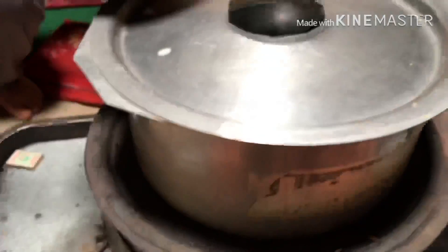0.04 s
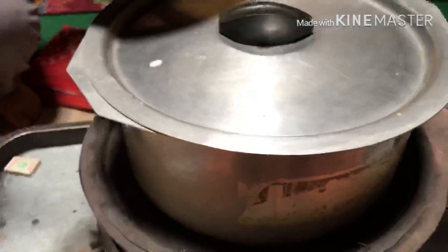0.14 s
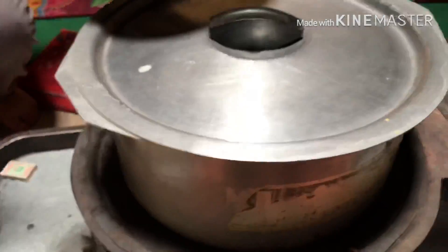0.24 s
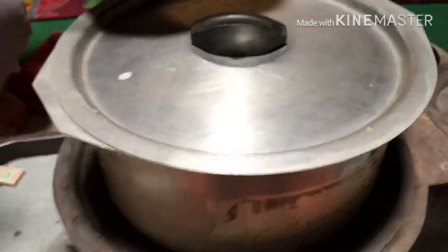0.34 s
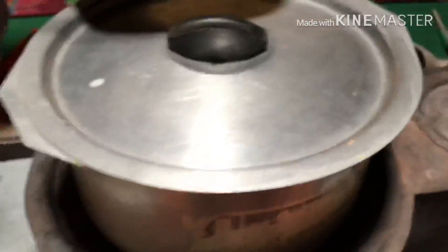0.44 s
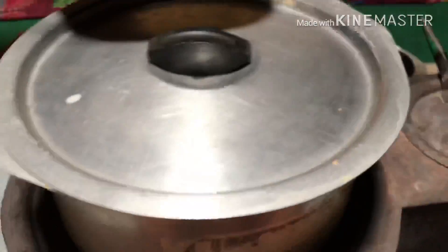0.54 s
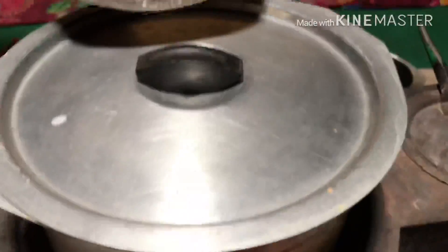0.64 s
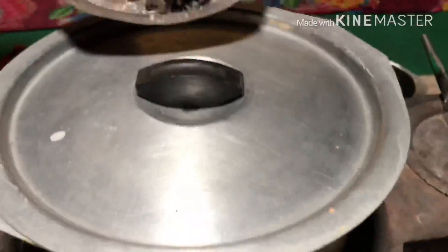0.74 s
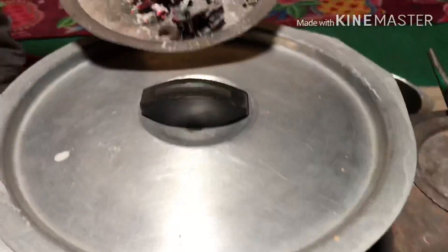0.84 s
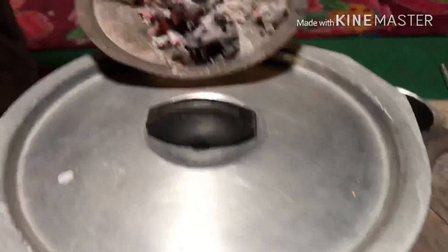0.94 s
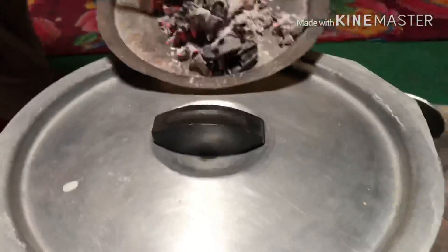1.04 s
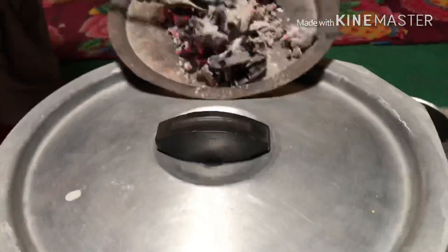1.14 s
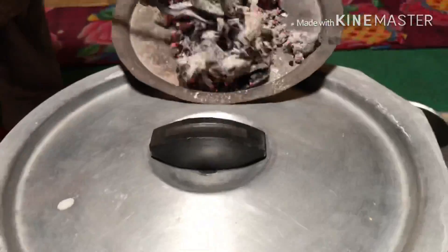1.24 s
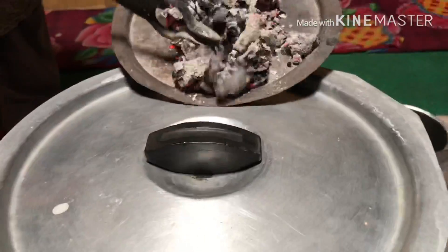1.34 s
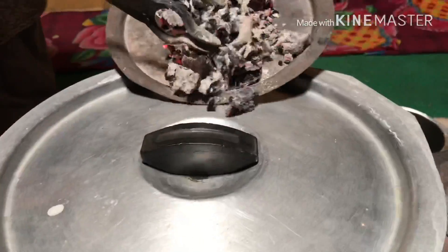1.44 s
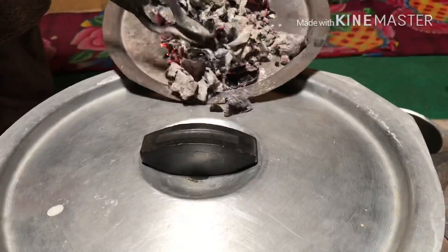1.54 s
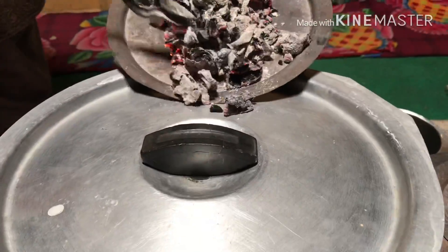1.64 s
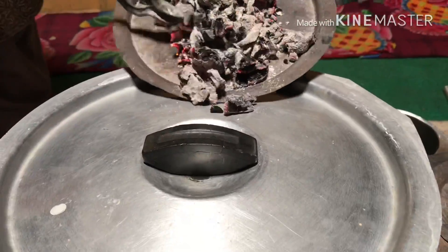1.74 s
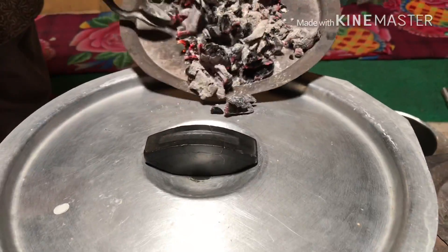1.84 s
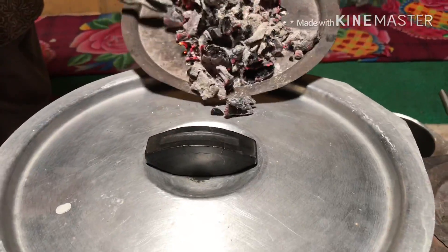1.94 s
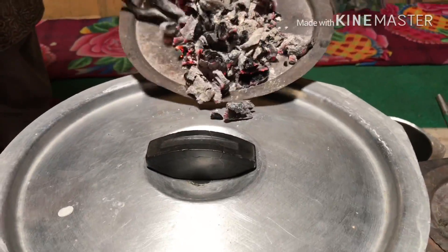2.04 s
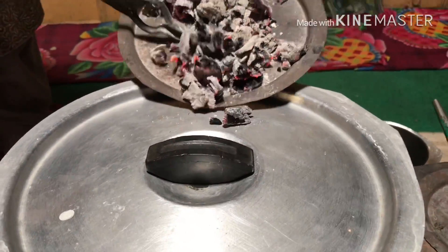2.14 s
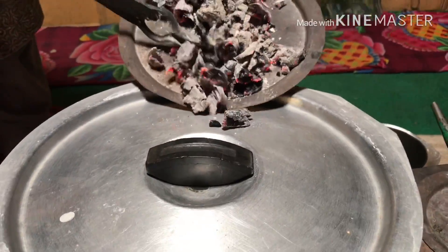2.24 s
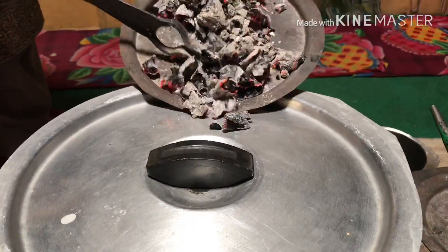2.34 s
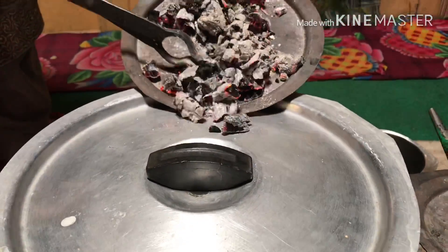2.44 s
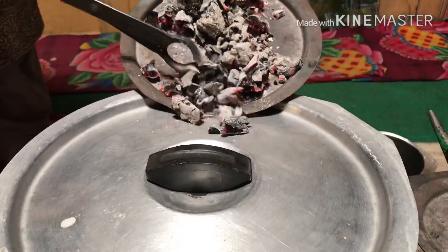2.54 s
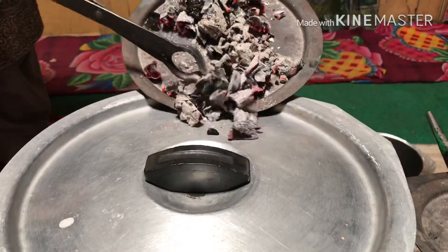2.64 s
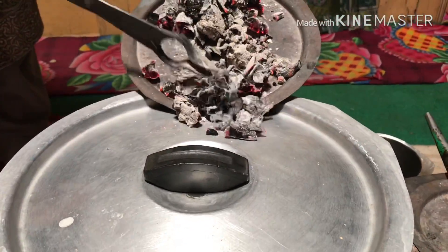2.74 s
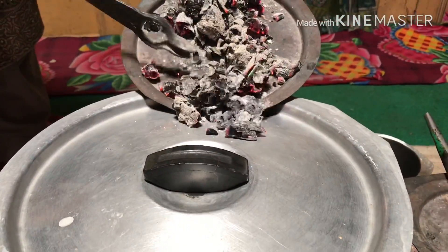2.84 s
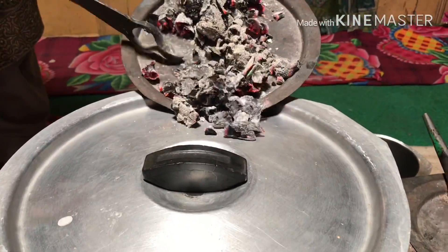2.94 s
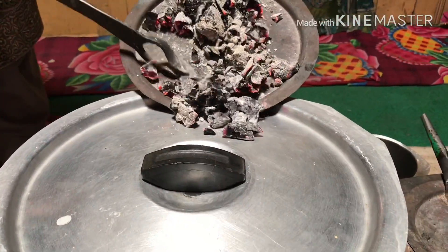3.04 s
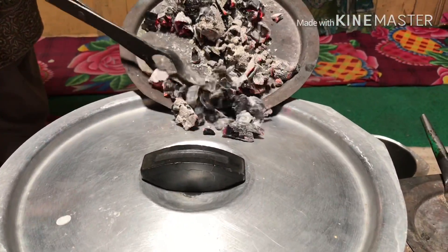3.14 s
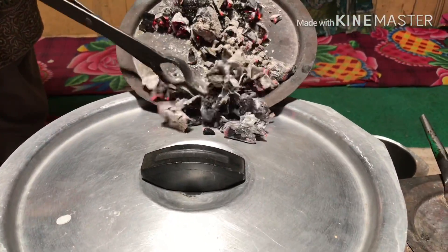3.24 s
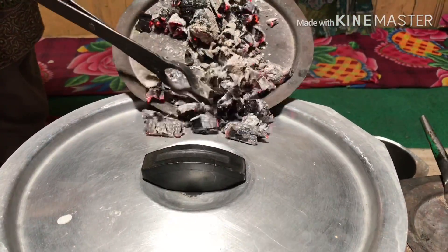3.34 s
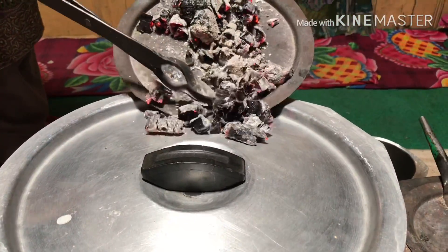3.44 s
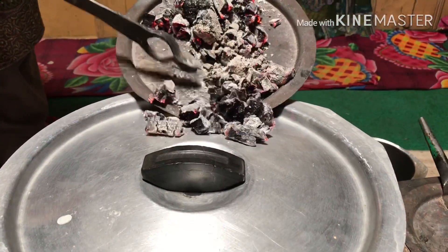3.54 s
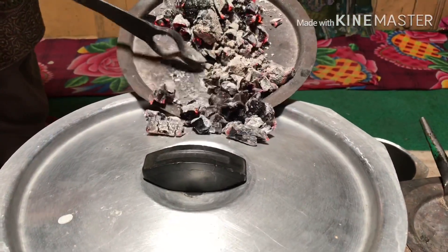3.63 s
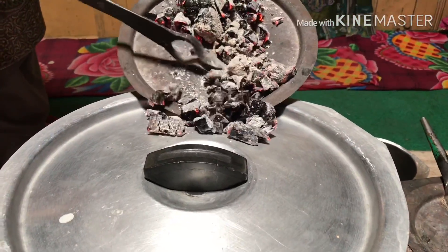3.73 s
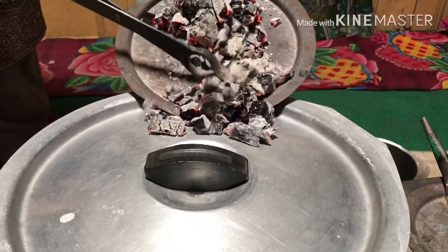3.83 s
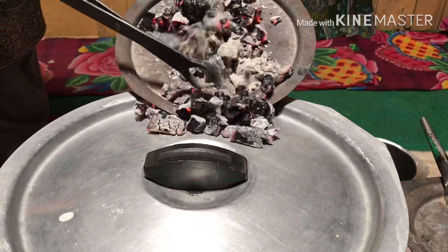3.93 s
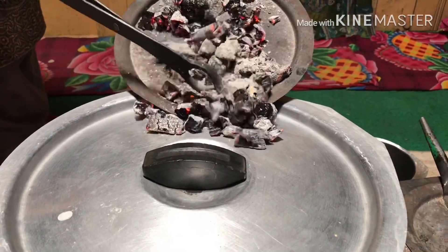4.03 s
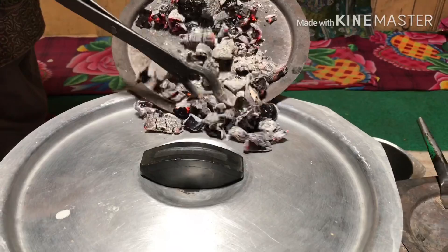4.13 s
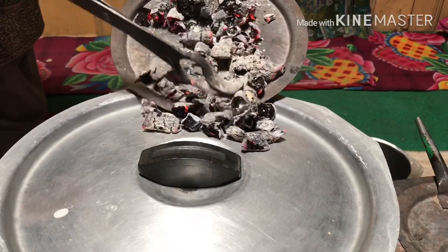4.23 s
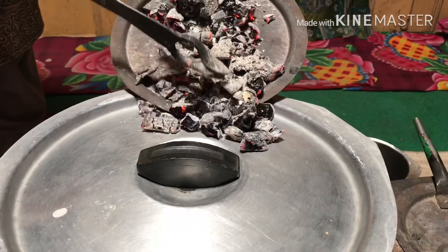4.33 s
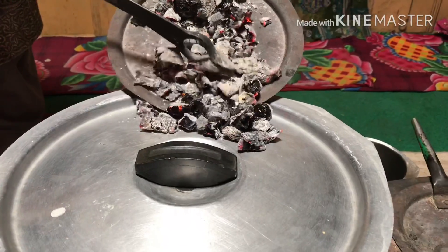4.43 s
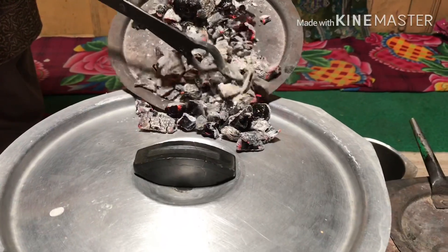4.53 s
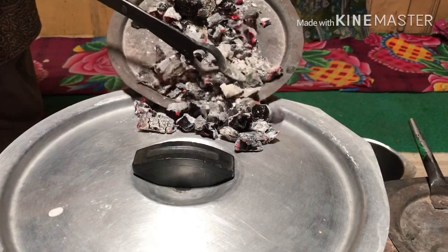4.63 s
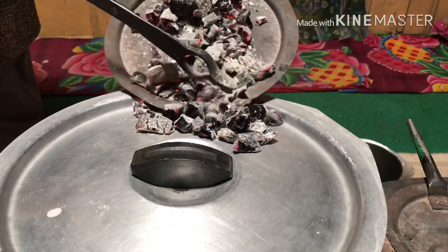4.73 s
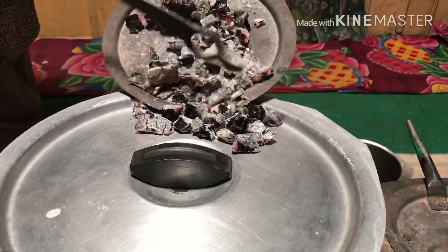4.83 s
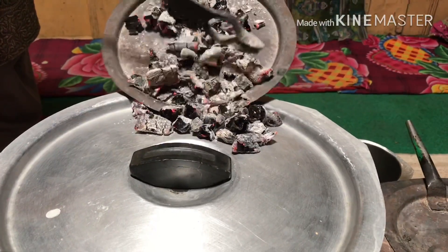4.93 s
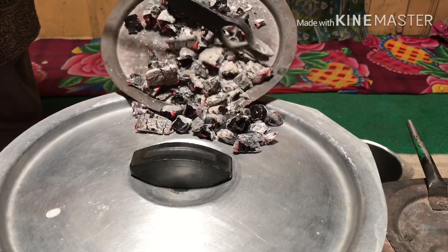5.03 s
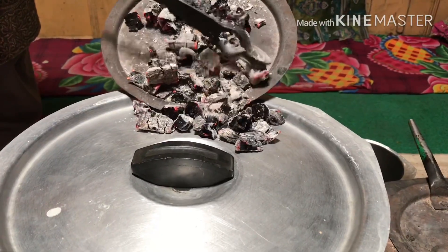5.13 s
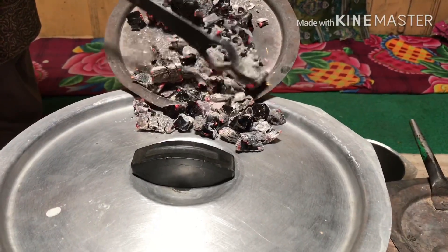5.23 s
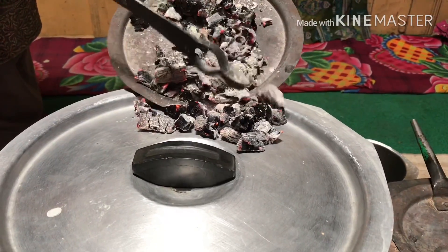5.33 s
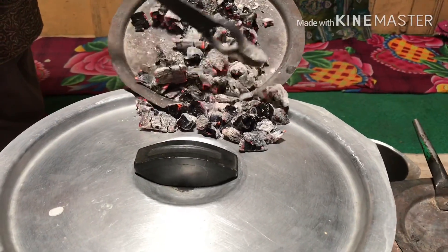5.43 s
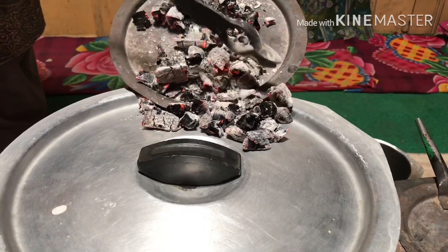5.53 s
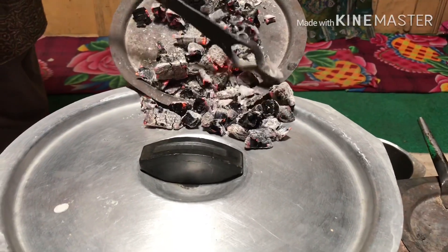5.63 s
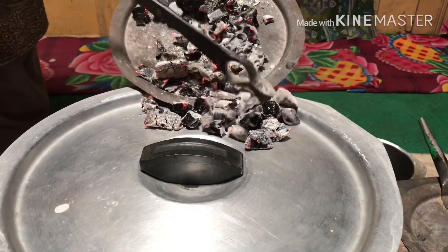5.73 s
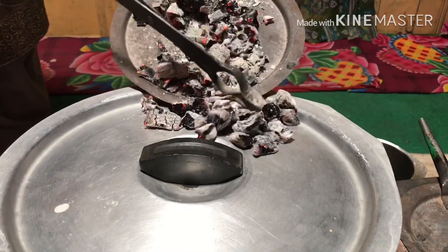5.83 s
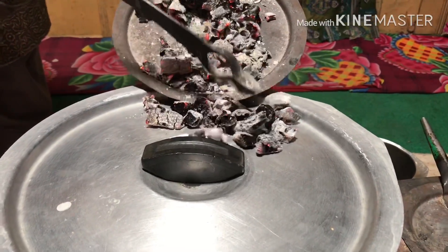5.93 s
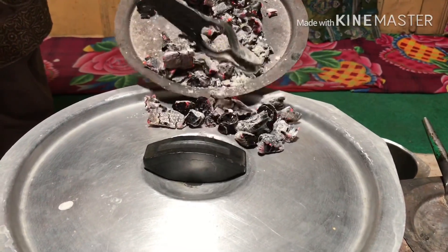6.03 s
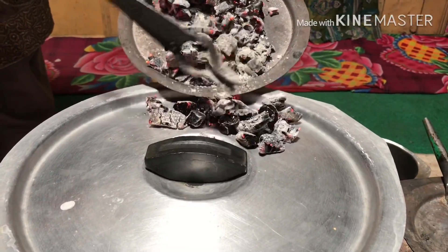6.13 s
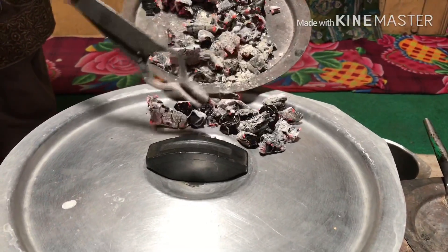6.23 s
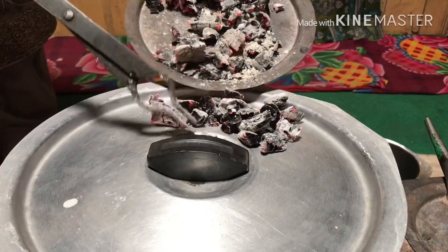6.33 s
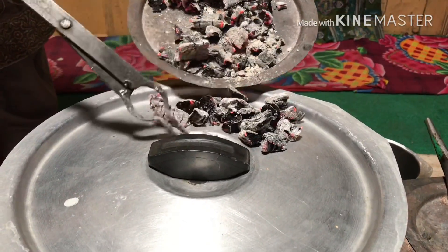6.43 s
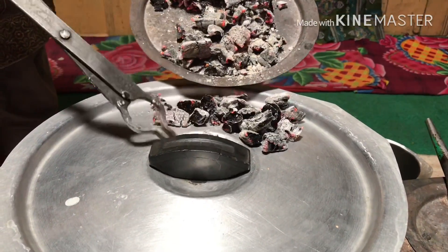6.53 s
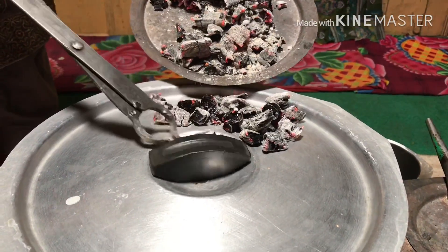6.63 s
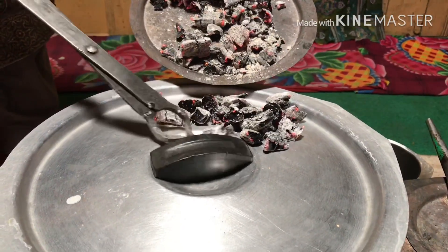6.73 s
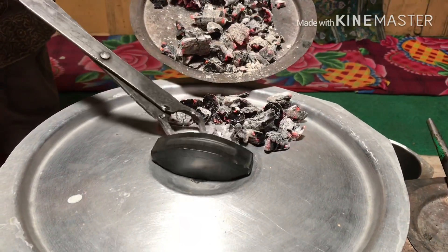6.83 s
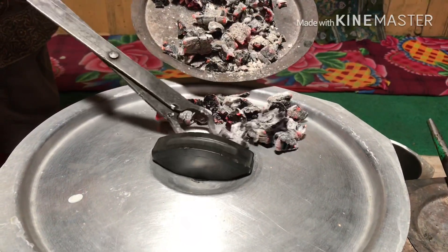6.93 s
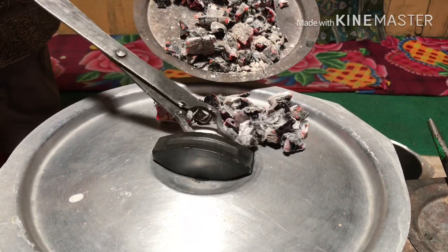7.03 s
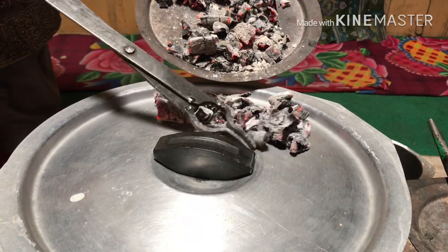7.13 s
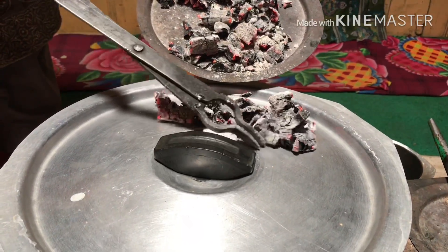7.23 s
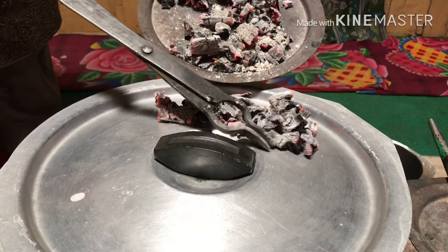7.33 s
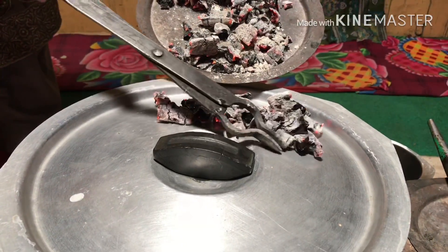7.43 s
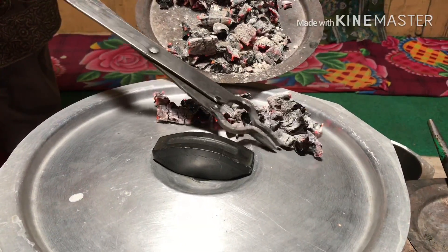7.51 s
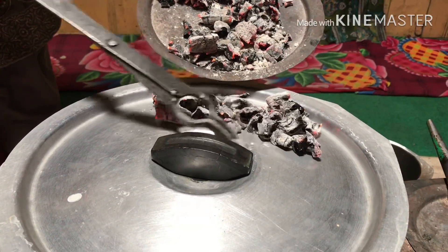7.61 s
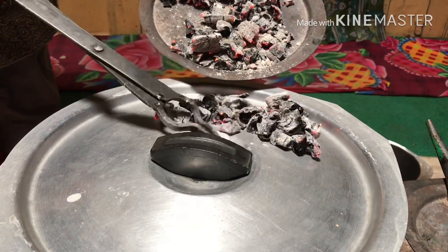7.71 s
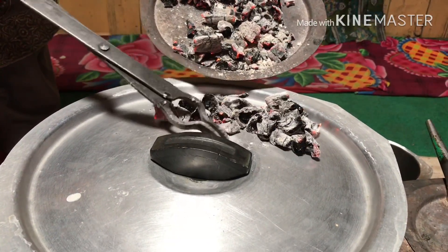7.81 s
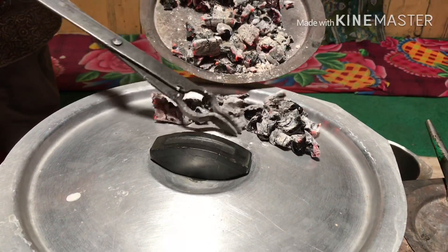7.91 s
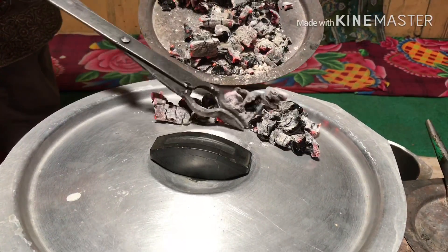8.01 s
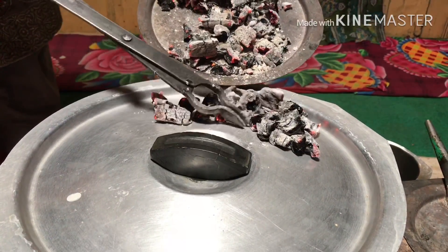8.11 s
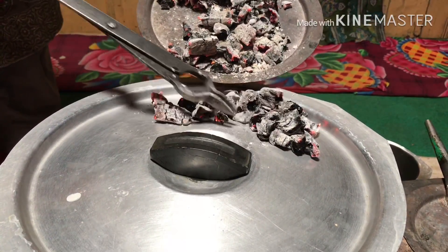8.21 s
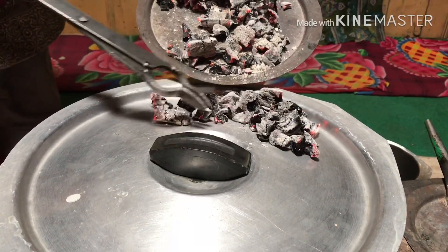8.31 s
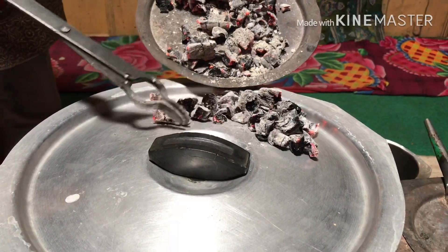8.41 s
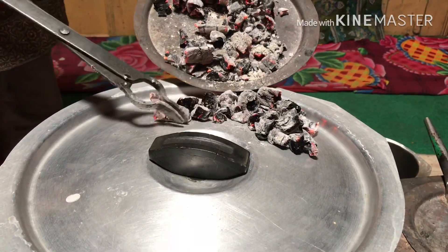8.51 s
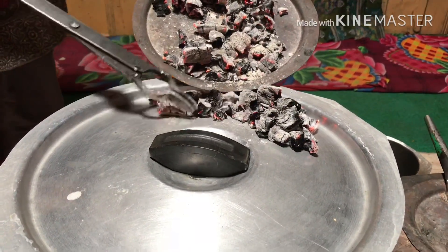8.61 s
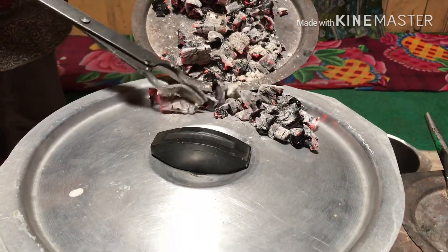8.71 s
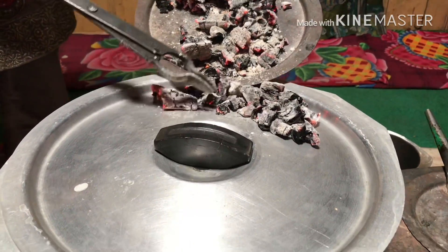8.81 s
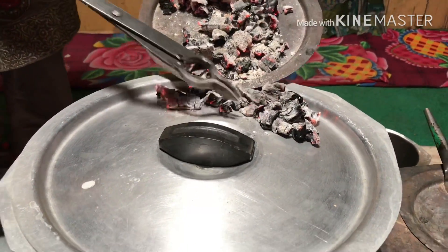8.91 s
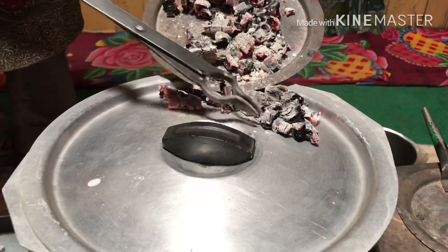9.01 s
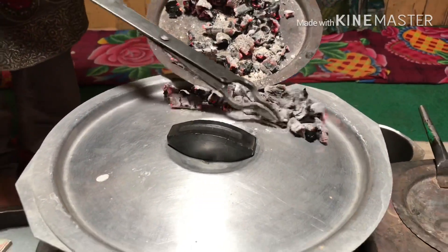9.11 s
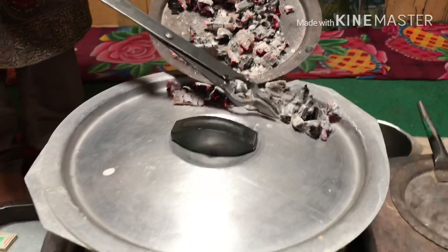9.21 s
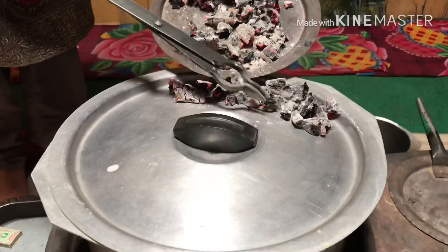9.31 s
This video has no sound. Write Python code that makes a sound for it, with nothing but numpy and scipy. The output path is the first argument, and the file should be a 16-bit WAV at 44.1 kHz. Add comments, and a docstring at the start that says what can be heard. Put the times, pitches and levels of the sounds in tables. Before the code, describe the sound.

A close, fairly dry sound in a small room with a quiet low hush. From 0 to 1 s there are soft dull taps, rustling and fumbling hands, with a tiny bright crackle at 0.7. From about 1.2 to 1.7 s a metal pan rim bumps and chatters boomily on an aluminium pot lid, with tong clinks. At 2.1 s tongs strike the pan with a clear short ring; raking follows, with crunching charcoal, a lump clacking down at 2.5 and a clink at 2.8. The loudest clank comes at 2.95, then busy scraping, low dragging and a bump at 3.65. Between 4.4 and 5.8 s lumps clack onto the lid while raking thins. After a lull, tong tips knock at 6.5 and scrape, with short narrow squeals and gritty zing around 7.2 to 8 s. Softer knocks, scrapes, small clinks and crunching coals finish by 9.3 s.

```python
"""In a small room with a soft hush, hands first tap, rustle and fumble, and a piece of charcoal crackles.
Tongs then rake glowing charcoal in a metal pan: it crunches and the steel arms shimmer and clink.
The pan's rim bumps an aluminium lid, the tongs strike the pan, the pan drags, lumps fall out.
Last, the tong tips scrape, squeal and knock on the lid as they spread the coals.
Blows are fading tones plus shaped noise; rubbing is a stream of tiny random contacts."""
import sys
import numpy as np
from scipy import signal
from scipy.fft import rfft, irfft, next_fast_len
from scipy.io import wavfile

SR = 44100
rng = np.random.default_rng(int(sys.argv[2]) if len(sys.argv) > 2 else 0)


def wav_out(sig):
    """Save sig, one row per channel (or a flat mono array), as 16-bit PCM at SR to the path in sys.argv[1]."""
    wavfile.write(sys.argv[1], SR, np.round(np.clip(np.atleast_2d(sig).T, -1, 1) * 32767).astype(np.int16))


N = 412776
RING_TIME = np.arange(int(.6 * SR)) / SR   # seconds since a strike
MEDIUM_DB = -52   # stroke level at which a side effect has its own medium level
STROKE_ATTACK_S = 0.0081   # every stroke takes hold within this time
# Levels in the tables are before each sound's own trim and the room.


def from_db(db):
    """Turn decibels into a gain."""
    return 10 ** (np.asarray(db) / 20)


def rms_one(x):
    """Scale a signal to an rms of 1."""
    return x / np.sqrt(np.mean(x ** 2) + 1e-20)


def band(x, low_hz, high_hz):
    """Keep only the sound between two pitches."""
    sos = signal.butter(2, [low_hz, min(high_hz, .45 * SR)], "band", fs=SR, output="sos")
    return signal.sosfilt(sos, x)


def coloured(x, colour):
    """Shape the balance of low and high sound with a colour table; rms 1."""
    size = next_fast_len(len(x))
    hz, db = np.transpose(colour)
    bins = np.maximum(np.arange(size // 2 + 1) * SR / size, 1)
    gain = from_db(np.interp(np.log(bins), np.log(hz), db))
    gain = gain * np.minimum(bins / hz[0], 1) ** 2   # fall away below the first pitch
    return rms_one(irfft(rfft(x, size) * gain, size)[:len(x)])


def drift(per_s):
    """Wander randomly through new values, per_s of them each second."""
    return np.interp(np.arange(N) / SR * per_s, np.arange(4096), rng.standard_normal(4096))


def dying(t60):
    """Fade by 60 dB in t60 seconds, like a ringing object."""
    return from_db(-60 * RING_TIME / t60)


def body(modes, colour, modes_db, ring_t60, bass_t60, crack_db, crack_t60):
    """Make a struck object: separate tones, a dense noisy ring and a brief crack."""
    hz, db, t60 = np.reshape(modes, (-1, 3)).T
    partials = np.exp(2j * np.pi * hz[:, None] * RING_TIME) * dying(t60[:, None])

    def strike(free_db=0):
        """Each point of contact excites the tones differently; a body left free rings more clearly."""
        weights = from_db(db + modes_db + free_db + 2 * rng.standard_normal(len(db)))
        weights = weights * np.exp(2j * np.pi * rng.random(len(db)))   # random phases
        tones = (weights @ partials).imag
        dense = coloured(rng.standard_normal(len(RING_TIME)), colour)
        low_pass = signal.butter(2, 350, fs=SR, output="sos")
        bass = signal.sosfiltfilt(low_pass, dense, padtype=None)
        upper_fade = dying(ring_t60) + from_db(crack_db) * dying(crack_t60)
        return tones + bass * dying(bass_t60) + (dense - bass) * upper_fade
    return strike


# Limits of the bass, middle, treble and top bands: pitch_hz
BAND_EDGES_HZ = [40, 400, 2000, 6000, 16000]


def blows(rows, strike, gain_db, bounce_db, top_db, top_follows):
    """A first contact and small bounces; thump sets the bass, hardness the treble and the top."""
    out = np.zeros(N + 2 * len(RING_TIME))
    attack = int(.02 * SR)   # the level is set over these first samples
    for s, level_db, thump_db, hard_db, chatter_ms, *free_db in rows:
        contact = np.zeros(int(abs(chatter_ms) * SR / 1000) + 2)
        bounces = (rng.random(size=6) * len(contact)).astype(int)
        contact[bounces] = from_db(bounce_db) * rng.standard_normal(size=6)
        contact[0] = 1
        sound = signal.fftconvolve(strike(*free_db), contact)[:len(RING_TIME)]
        start = int(s * SR)
        band_levels = (thump_db, 0, hard_db, top_db + top_follows * hard_db)
        for k, db in enumerate(band_levels):
            part = band(sound, *BAND_EDGES_HZ[k:k + 2]) * (-1) ** k   # alternate signs join without a notch
            gain = from_db(level_db + db + gain_db) / np.std(part[:attack])
            out[start:start + len(part)] += part * gain
    return out[:N]


def slips(per_s, spread_db, surge_db):
    """Friction as tiny random contacts of uneven size that come in surges; rms 1."""
    sizes = from_db(spread_db * np.minimum(rng.exponential(1, N), 4)) * rng.choice([-1, 1], N)
    happens = rng.random(N) < per_s / SR
    return rms_one(sizes * happens * from_db(surge_db * drift(70)))


def rubbed(friction, strike, free_db=0, count=3):
    """Friction makes a body ring; the contact hops between spots, each with its own colour."""
    spot = np.argmax([drift(45) for _ in range(count)], axis=0)
    out = np.zeros(N)
    for k in range(count):
        response = strike(free_db)
        response = response / np.linalg.norm(response)
        out += signal.oaconvolve(friction * (spot == k), response)[:N]
    return out


def strokes(rows, swell_db, release_t60):
    """Turn (start_s, length_s, level_db) rows into a loudness curve: attack, changing hold, release."""
    t, out = np.arange(N) / SR, np.zeros(N)
    for start, length, db in rows:
        near = (t > start) & (t < start + length + release_t60)
        age = t[near] - start
        swell = swell_db * (np.minimum(age / length, 1) - .5)
        release = -60 * np.maximum(age - length, 0) / release_t60
        out[near] += np.minimum(age / STROKE_ATTACK_S, 1) * from_db(db + swell + release)
    return out


def driven(rows, medium_db, follows):
    """Make a side effect of the strokes; its level moves by `follows` dB per dB of theirs."""
    return [(s, length, medium_db + follows * (db - MEDIUM_DB)) for s, length, db in rows]


# Loudness of the hush over time: time_s, level_db
HUSH = [(0, -63), (.8, -65), (1.9, -66.5), (5.5, -63), (6.4, -68.5), (8.35, -70), (9.36, -66.5)]
# Balance of low and high sound in the hush: pitch_hz, level_db
ROOM_COLOUR = [(15, -66), (25, -34), (92, 4), (137, -5.5), (161, 1.5), (223, -5), (754, -11.5), (911, -9.5),
               (1020, -12), (2350, -12.5), (2550, -12.5), (3720, -17), (16000, -23)]


def background_hush():
    """Steady shaped noise whose level slowly rises and falls."""
    level = from_db(np.interp(np.arange(N) / SR, *np.transpose(HUSH)))
    return level * coloured(rng.standard_normal(N), ROOM_COLOUR)


# Dry handling taps, and one bright charcoal crackle at 0.659 s:
# start_s, level_db, thump_db, hardness_db, chatter_ms
TAPS_AND_CRACKLE = [(0.036, -48, -7, -8.5, 1.1), (0.421, -50, -4, -10.5, 1.93),
                    (0.461, -53.5, 4.5, -26, 0.95), (0.659, -63, -17, 15, 1.04), (0.724, -69, 16, -1, 16),
                    (0.925, -54.5, -3, -15, 2.9), (0.949, -55.5, 9, -15, 2.8)]
# Balance of low and high sound in taps and fumbling: pitch_hz, level_db
TAP_COLOUR = [(29, -37), (50, 15.5), (507, 0.5), (678, -8.5), (927, -3.5), (1780, -20), (3250, -19),
              (10400, -44), (14500, -32), (16000, -41)]


def taps_and_crackle():
    """Dry taps, mostly dull, and one bright crackle: fast-fading noise with no separate ringing tones."""
    tap = body([], TAP_COLOUR, modes_db=0, ring_t60=0.049, bass_t60=0.022, crack_db=12.0, crack_t60=.008)
    return blows(TAPS_AND_CRACKLE, tap, gain_db=-1.5, bounce_db=-19.5, top_db=-3, top_follows=0.64)


# Light rustles of handling: start_s, length_s, level_db
RUSTLES = [(0.04, 0.068, -56.5), (0.91, 0.31, -77), (1.74, 0.05, -63)]


def rustling():
    """Many tiny contacts every second, kept to the upper middle pitches."""
    moving = strokes(RUSTLES, swell_db=-1.5, release_t60=0.043)
    return moving * rms_one(band(slips(3200, 3.0, 2.0), 1800, 5600))


# Soft fumbling of hands: start_s, length_s, level_db
FUMBLES = [(0.05, 0.15, -59.5), (0.33, 0.064, -53.5), (0.53, 0.35, -64), (0.91, 0.026, -53),
           (1.06, 0.027, -61)]


def fumbling():
    """Low, soft rubbing with sparse dry ticks while the hands move."""
    moving = strokes(FUMBLES, swell_db=-3.0, release_t60=0.11)
    soft = rms_one(band(coloured(slips(540, 5.0, 1.2), TAP_COLOUR), 45, 860))
    ticks = rms_one(band(coloured(slips(59, 3.4, 2), TAP_COLOUR), 1240, 15000))
    return moving * (soft + from_db(-11) * ticks)


# Ringing tones of the pan: pitch_hz, level_db, fade_60db_s
PAN_MODES = [(134, -30, .3), (272, -15, 0.22), (575, -8, 0.055), (890, 4, 0.083), (997, -3.5, 0.075),
             (1023, -6, 0.14), (1270, -7, 0.074), (1511, -1, 0.099), (1610, -7.5, 0.16), (1700, -9.5, .12),
             (2114, -4.5, 0.11), (2470, 0, 0.058), (3460, -13, 0.14), (5010, -2.5, 0.13),
             (5110, -11.5, 0.087), (7220, -2, 0.041)]
# Balance of low and high sound in the dense ring of pan and tong arms: pitch_hz, level_db
PAN_COLOUR = [(29, -32), (50, -20.5), (125, 7.5), (208, -1.5), (252, -1.5), (298, -3.5), (630, -18),
              (884, -2.5), (1150, -6), (1620, -4), (4450, -12), (5020, -9.5), (6390, -18.5), (8540, -16.5),
              (16000, -29.5)]


def pan_bowl():
    """The metal pan as the tongs hit or rub it."""
    return body(PAN_MODES, PAN_COLOUR, modes_db=0, ring_t60=0.18, bass_t60=0.12, crack_db=6, crack_t60=0.035)


# Strokes of the tongs through the coals in the pan: start_s, length_s, force_db
RAKE_STROKES = [(0.879, 0.46, -62.5), (1.167, 0.17, -74), (2.1, 0.25, -57), (2.348, 0.38, -53),
                (2.983, 0.056, -38.5), (3.086, 0.063, -39), (3.174, 0.13, -58), (3.295, 0.036, -46.5),
                (3.39, 0.18, -61), (3.739, 0.14, -38.5), (3.911, 0.13, -54), (4.121, 0.046, -48),
                (4.345, 0.17, -59), (4.628, 0.039, -52.5), (5.068, 0.16, -62)]


def raking():
    """The tongs rub the pan, and the uneven contacts make the metal ring."""
    moving = strokes(RAKE_STROKES, swell_db=0.5, release_t60=0.14)
    scrape = rubbed(moving * slips(500, 3.85, 1.2), pan_bowl(), free_db=-3.5, count=5)
    return from_db(-2) * band(scrape, 160, 9900)


# The heap on the lid is pushed and settles: start_s, length_s, crunch_db
HEAP_SHIFTS = [(5.78, 0.044, -50.5), (5.86, 0.28, -72.5), (7.702, 0.009, -51.5), (7.98, 0.035, -55),
               (8.06, 0.053, -61), (8.46, 0.28, -59.5), (8.71, 0.043, -60), (8.92, 0.28, -61.5)]


def coal_motion():
    """Lumps grind whenever the pan is raked or the heap on the lid shifts."""
    in_pan = driven(RAKE_STROKES, medium_db=-58.5, follows=0.72)
    return strokes(in_pan + list(HEAP_SHIFTS), swell_db=1.5, release_t60=0.24)


# Balance of low and high sound in the crunch: pitch_hz, level_db
CRUNCH_COLOUR = [(2500, -14.5), (5000, -4), (7500, -2.5), (10000, 0), (13000, -11.5), (15000, -1.5),
                 (16000, 4)]


def coal_crunch():
    """Moving lumps grind together in bright, strongly surging bits of noise."""
    return from_db(-3.5) * coal_motion() * coloured(slips(1800, 3.5, 4.5), CRUNCH_COLOUR)


# Ringing tones of the tongs' steel arms: pitch_hz, level_db, fade_60db_s
TONG_MODES = [(1092, -5.5, 0.12), (2687, 6.5, 0.1), (2967, 4.5, 0.18), (3290, 7, 0.16), (3805, 4.5, 0.19),
              (4140, -22, 0.13), (4305, 2.5, 0.18), (5150, 2.5, 0.14), (5510, -3, 0.069), (5950, 0.5, 0.13),
              (6780, -3, 0.22), (7393, 0, 0.11), (8270, -9, 0.19), (8700, -0.5, 0.06), (9000, -19, 0.15),
              (9400, -9, 0.14), (9460, -4, 0.12), (11050, -3.5, 0.16), (12600, -3, 0.068),
              (14360, -3.5, 0.081)]


def tong_arms():
    """The steel arms, held free so that their tones stand out."""
    return body(TONG_MODES, PAN_COLOUR, modes_db=5.5, ring_t60=0.21, bass_t60=0.16,
                crack_db=9.5, crack_t60=0.037)


def arm_shimmer():
    """Moving coals keep the arms ringing in their high tones."""
    shimmer = rubbed(coal_motion() * slips(700, 2.5, 8.1), tong_arms(), free_db=2)
    return from_db(2.5) * band(shimmer, 4200, 18000)


# Ringing tones of rim and lid together: pitch_hz, level_db, fade_60db_s
RIM_MODES = [(124.8, 6, 0.17), (161, -3, 0.15), (338, -2.5, 0.094), (435.5, -8, 0.13), (868, 4.5, 0.18),
             (898, -4.5, 0.13), (1049, 1, 0.066), (1630, -10, 0.16), (2290, -3, 0.084), (2790, -13.5, 0.26),
             (2930, -11, 0.23), (3304, -6.5, 0.19), (3810, -5, 0.15), (4480, -9, 0.058), (4560, -2.5, .08),
             (5110, -3.5, 0.044), (5900, -8.5, 0.14), (6380, -26, .1), (6780, -9, .1), (7270, -9, .1),
             (7940, -31, 0.11), (8800, -8.5, 0.064), (9320, -10.5, 0.042)]
# Balance of low and high sound in their dense ring: pitch_hz, level_db
RIM_COLOUR = [(29, -43), (50, -5), (135, 10.5), (198, -28), (450, -20.5), (711, -19), (842, -10),
              (1700, -14), (3330, -12.5), (3580, -15.5), (7040, -22.5), (16000, -33.5)]


def pan_rim():
    """The pan's rim against the lid, which booms."""
    return body(RIM_MODES, RIM_COLOUR, modes_db=2.5, ring_t60=0.23, bass_t60=0.071,
                crack_db=15.5, crack_t60=0.015)


# The pan's rim bumps the lid: start_s, level_db, thump_db, hardness_db, chatter_ms
PAN_BUMPS = [(1.168, -46.5, 6.5, -1, 16), (1.239, -47, 4, 1, 16.7), (1.361, -41.5, -5.5, -10, 25),
             (1.389, -50.5, 7, 5, 7.3), (1.502, -55, 9.5, 5.5, 16.7), (1.658, -69, 18.5, 16, 6.3),
             (1.729, -54.5, 7.5, -3, 24), (2.318, -55.5, 8, -3, 15.6), (2.411, -49, 3, -9, 14.3),
             (3.654, -37, -4.5, -8.5, 19)]


def rim_bumps():
    """The rim knocks and bounces on the lid; each knock has a brief faint noisy onset."""
    rim = pan_rim()
    onset_s, onset_db = 0.011, -14   # length of the onset; dB relative to the bump's listed level
    onset_rows = [(s - onset_s, onset_s, db + onset_db) for s, db, *_ in PAN_BUMPS]
    onset_level = strokes(onset_rows, swell_db=5, release_t60=0.034)
    onsets = rubbed(onset_level * slips(2500, 2.5, 1.5), rim, count=1)
    return onsets + blows(PAN_BUMPS, rim, gain_db=-1.0, bounce_db=-3.5, top_db=1.0, top_follows=0.42)


# The tongs clink: start_s, level_db, thump_db, hardness_db, chatter_ms, free_ring_db
TONG_CLINKS = [(1.262, -41.5, -12, -17, 4.4, -4), (1.423, -46, -30, 2.5, 2.93, -3),
               (2.762, -39, -9, -1, 2.58, 4), (3.35, -36.5, -26, -11.5, 3.56, 2.5),
               (4.67, -64.5, -8, 17.5, 2.4, -10), (4.815, -55, -30, -5, 3.3, -6), (5.77, -58, 1, 0, 4, -7),
               (6.189, -64, -20, 4, 1.8, -12), (8.077, -56.5, -3.5, 3, 8, -8),
               (8.179, -62.5, -2, 3.5, 2.1, -4), (8.93, -54, -8, 0.5, 12, -11),
               (9.048, -61, -17, -4, 6.6, -18)]


def tong_clinks():
    """Short contacts set the steel arms ringing; free_ring_db sets how clear their tones are."""
    return blows(TONG_CLINKS, tong_arms(), gain_db=-2.5, bounce_db=-8, top_db=-8, top_follows=0.59)


# The tongs strike the pan: start_s, level_db, thump_db, hardness_db, chatter_ms, free_ring_db
PAN_STRIKES = [(1.885, -54.5, -16, -18, 2.9, -1), (2.0545, -33, -9.5, 1, 4, 4),
               (2.083, -32, -22, -34, 10, 7), (2.127, -44, -30, -10, 12, 6), (2.186, -51.5, -29, 0, 7, 6),
               (2.256, -44, -35, -8, 6.9, 2), (2.72, -55, -21, 2, 6, 1), (2.9575, -27, -3, 1.5, 6.43, -6.5),
               (3.07, -34, -11, -10.5, 4.4, -10), (3.126, -42.5, 0, 4, 15, -15),
               (3.158, -46, -3.5, 0, 11, -1), (3.49, -54, -2.5, 0.5, 17.5, -11),
               (3.732, -40.5, -24, 2, 17.5, 2), (3.767, -44, -21, 2, 7, 6), (3.924, -48, -16, 1.5, 7.3, 1),
               (4.055, -47.5, -28, 2.5, 10, -6), (4.107, -51.5, -9, 4.5, 8.1, 1),
               (4.292, -46.5, -28, -6, 14.8, 1.5), (4.362, -51.5, -23, -7, 16, 0)]


def pan_strikes():
    """The tongs hit the pan, and the pan rings after a brief chatter."""
    return blows(PAN_STRIKES, pan_bowl(), gain_db=-4.5, bounce_db=-6, top_db=-6, top_follows=0.32)


# The time during which the pan rests on the lid: start_s, end_s
PAN_RESTS_S = (2.3, 4.25)


def pan_drag():
    """While resting on the lid, the pan shifts with each rake stroke and makes a low rumble."""
    resting = [row for row in RAKE_STROKES if PAN_RESTS_S[0] < row[0] < PAN_RESTS_S[1]]
    dragging = strokes(driven(resting, medium_db=-56, follows=0.27), swell_db=6.0, release_t60=0.15)
    rumble = rubbed(dragging * slips(500, 1.8, 2.4), pan_rim(), free_db=-4.5)
    return from_db(3) * band(rumble, 61, 360)


# Lumps of charcoal land on the lid: start_s, level_db, thump_db, hardness_db, chatter_ms
LUMP_FALLS = [(2.4695, -34.5, -7, -6.5, 6.77), (2.646, -47, -1.5, -4, 6), (4.431, -42, -3.5, -0.5, 9.8),
              (4.556, -34, -27, -3, 2.1), (4.563, -37.5, -1, -5, 4.34), (4.745, -57, -19, 0, 19.4),
              (5.046, -61, -21, 4.5, 16), (5.145, -43.5, -6.5, -7.5, 8.1), (5.235, -47, -10, -8, 15),
              (5.372, -50, -3.5, -7.5, 2.18), (5.447, -62, 2, -3.5, 1.98), (5.686, -43.5, -5, 0, 5.7),
              (5.779, -48.5, 3.5, -0.5, 12.1)]
# Ringing tones of the lid: pitch_hz, level_db, fade_60db_s
LID_MODES = [(133, -13, 0.19), (580, 2, 0.084), (642, -4, 0.071), (847, 8, 0.036), (1032, 5.5, 0.072),
             (1578, 1.5, 0.074), (2054, -8, 0.19), (2263, 2.5, 0.053), (2670, -17, 0.29), (5025, -9, 0.14),
             (5594, -9, 0.093), (7010, -24, 0.22), (6930, -18, 0.4)]
# Balance of low and high sound in the lid's dense ring: pitch_hz, level_db
LID_COLOUR = [(29, -41), (50, -9.5), (138, -14), (284, -16.5), (572, -10), (783, -8), (1050, 0),
              (1430, -14.5), (1620, -14.5), (2440, -12.5), (3760, -20), (5020, -22.5), (6390, -22),
              (7040, -19.5), (16000, -27)]


def lump_falls():
    """Lumps clack and bounce on the lid, which rings briefly."""
    lid = body(LID_MODES, LID_COLOUR, modes_db=1, ring_t60=0.14, bass_t60=0.22, crack_db=3.0, crack_t60=0.062)
    return blows(LUMP_FALLS, lid, gain_db=-0.5, bounce_db=-5.5, top_db=-8, top_follows=2.54)


# Ringing tones of the tips pressed on the lid: pitch_hz, level_db, fade_60db_s
TIP_MODES = [(96.4, -7, 0.12), (192, -3, 0.14), (270.3, -3, 0.13), (331, -7, 0.13), (967, 1, 0.093),
             (2394, 7, 0.017), (2425, 2, 0.074), (2820, -10, 0.15), (3774, -5.5, 0.073), (5440, -6, 0.033),
             (5770, -16, 0.24), (5900, -3.5, 0.049), (7780, -17, 0.078), (9050, -27.5, 0.16),
             (10870, -12.5, 0.077), (12400, -31, .1), (13500, -26, .1)]
# Balance of low and high sound in their dense ring: pitch_hz, level_db
TIP_COLOUR = [(40, -30), (75, 11.5), (300, 5.5), (420, -18), (540, 1), (660, -24), (830, -3.5), (1020, 0.5),
              (1300, -5), (1850, -11.5), (2450, -5), (3300, -13.5), (5800, -28.5), (6800, -27.5),
              (16000, -22)]


def tong_tips():
    """The tong tips pressed on the lid."""
    return body(TIP_MODES, TIP_COLOUR, modes_db=-1.5, ring_t60=0.098, bass_t60=0.11,
                crack_db=13, crack_t60=0.021)


# High resonances of the pressed tips: pitch_hz, width_hz, level_db
TIP_RESONANCES = [(5840, 240, 10), (7330, 160, 2), (8050, 130, -2), (8800, 180, 0.5), (9460, 200, 3.5),
                  (11150, 390, 3), (12400, 360, -1), (14000, 200, 2), (14500, 350, -3), (15500, 220, 3)]


def zing(friction):
    """Grit under the pressed tips excites their damped high resonances."""
    out = np.zeros(N)
    for hz, width, db in TIP_RESONANCES:
        peak = signal.iirpeak(hz, hz / width, fs=SR)
        out += from_db(db) * signal.lfilter(*peak, friction)
    return out


# Strokes of the tips across the lid: start_s, length_s, scrape_db, squeal_db
TIP_STROKES = [(5.89, 0.15, -62.5, -60.5), (6.581, 0.26, -52, -61), (6.869, 0.28, -55.5, -60),
               (7.172, 0.041, -51.5, -47.5), (7.315, 0.11, -52, -50.5), (7.817, 0.08, -53.5, -50.5),
               (7.989, 0.034, -56, -52), (8.628, 0.14, -56, -88), (8.977, 0.25, -59, -85)]


def tip_strokes():
    """Sliding tips scrape, sticking tips squeal in a narrow band, and ash under them adds bright grit."""
    tip = tong_tips()
    sliding = [(s, length, db) for s, length, db, _ in TIP_STROKES]
    sticking = [(s, length, db) for s, length, _, db in TIP_STROKES]
    scraping = strokes(sliding, swell_db=3.5, release_t60=0.11)
    scrape = rubbed(scraping * slips(1100, 2.9, 1.8), tip, free_db=-1)
    squealing = strokes(sticking, swell_db=-4.0, release_t60=0.11)
    squeal = squealing * rms_one(band(rubbed(slips(300, 2.8, 3.7), tip), 2100, 2660))
    gritty = strokes(driven(sticking, medium_db=-61, follows=.6), swell_db=-3, release_t60=0.38)
    grit = gritty * rms_one(zing(slips(2500, 2.6, 5.9)))
    return from_db(-1) * scrape + from_db(1.0) * squeal + grit


# The tong tips knock on the lid: start_s, level_db, thump_db, hardness_db, chatter_ms
TIP_KNOCKS = [(6.5165, -36, -1.5, 8, 4.03), (6.576, -40, 5.5, 0.5, 9.4), (6.688, -47.5, -4, 1.5, 3.94),
              (6.867, -49, 6, 9.5, 1.68), (7.2655, -40, 0, 6, 1.4), (7.418, -54.5, 1, 8.5, 10.5),
              (7.722, -44.5, 3.5, 5.5, 1.9), (7.741, -46, -2, -0.5, 2.66), (7.9445, -43.5, 1, 11.5, 1.497),
              (7.988, -47.5, -22, 7, 5.9), (8.461, -49, 8.5, -5, 9.7), (8.516, -43, -2.5, -25, 22.4),
              (8.736, -52.5, 3, -14, 16)]


def tip_knocks():
    """The tips hit the lid and chatter briefly."""
    return blows(TIP_KNOCKS, tong_tips(), gain_db=-4.5, bounce_db=-3.5, top_db=-15.5, top_follows=0.033)


def room(x, wet_db, t60, wall_hz):
    """Add a short, dull tail of fading noise, as from scattered reflections."""
    tail = band(rng.standard_normal(len(RING_TIME)), 89, wall_hz) * dying(t60)
    tail = tail * (RING_TIME > .008)   # a short gap before the reflections
    return x + from_db(wet_db) * signal.fftconvolve(x, tail / np.linalg.norm(tail))[:N]


def scene():
    """All sources in the room, over its hush; thin metal radiates almost no deep bass."""
    dry_sounds = taps_and_crackle() + rustling() + fumbling()
    pan = raking() + rim_bumps() + pan_strikes() + pan_drag()
    charcoal = coal_crunch() + lump_falls()
    tongs = arm_shimmer() + tong_clinks() + tip_strokes() + tip_knocks()
    high_pass = signal.butter(6, 60, "high", fs=SR, output="sos")
    metal = signal.sosfilt(high_pass, pan + charcoal + tongs)
    return (room(dry_sounds + metal, wet_db=-15.5, t60=0.3, wall_hz=8800) + background_hush())[None]


def record(dry):
    """Cut the top steeply above 15900 Hz."""
    return signal.sosfilt(signal.ellip(10, .1, 80, 15900, fs=SR, output="sos"), dry)


dry = scene()
out = record(dry)
wav_out(out)
```